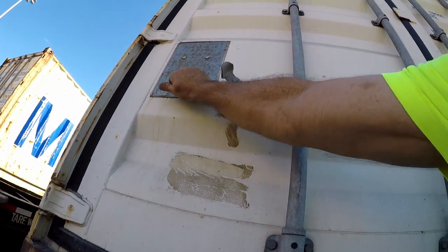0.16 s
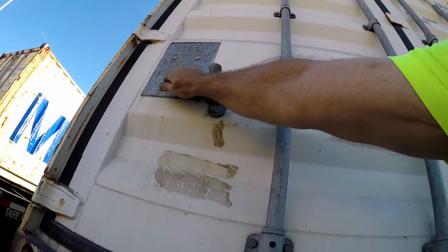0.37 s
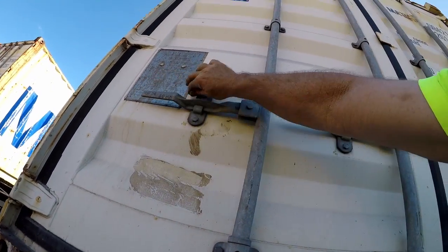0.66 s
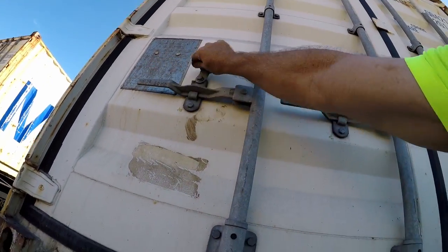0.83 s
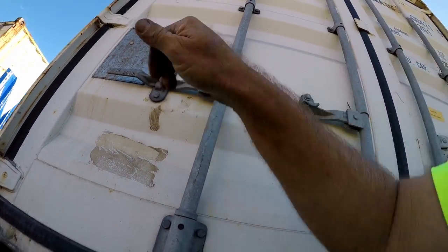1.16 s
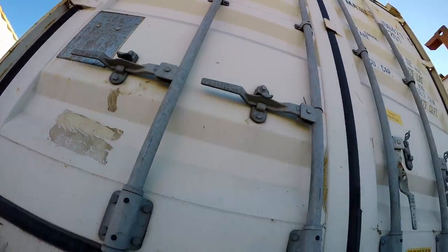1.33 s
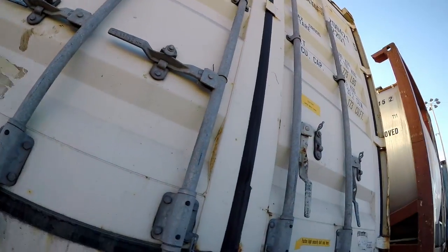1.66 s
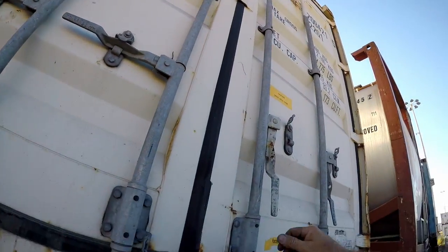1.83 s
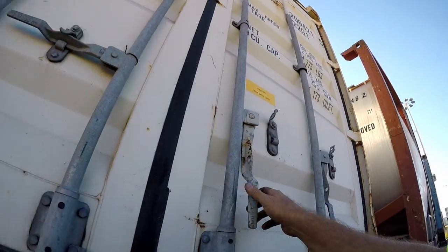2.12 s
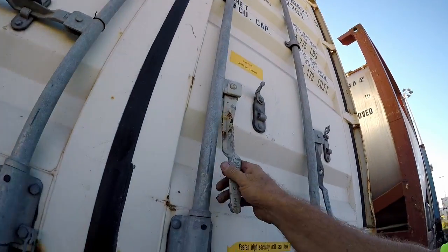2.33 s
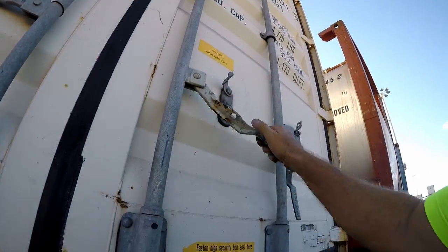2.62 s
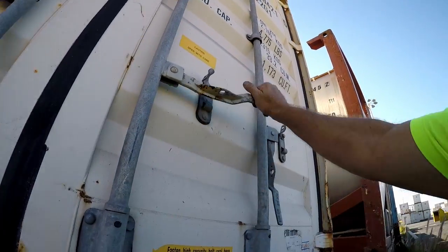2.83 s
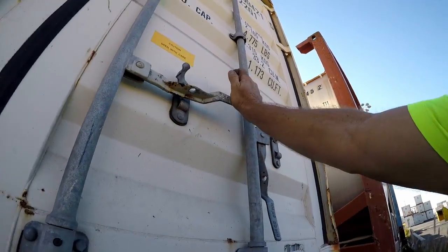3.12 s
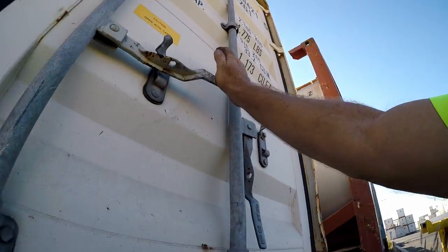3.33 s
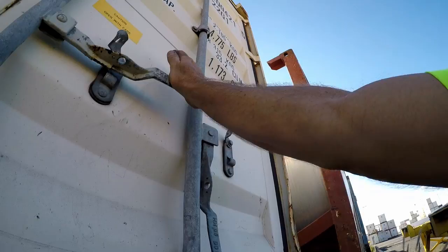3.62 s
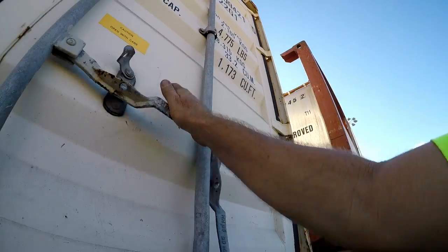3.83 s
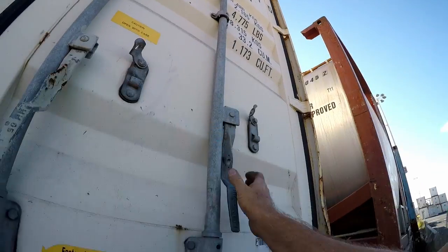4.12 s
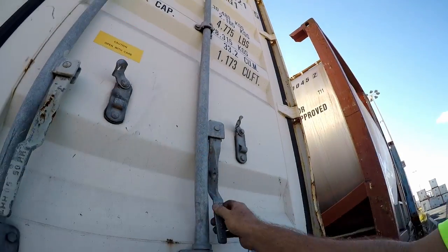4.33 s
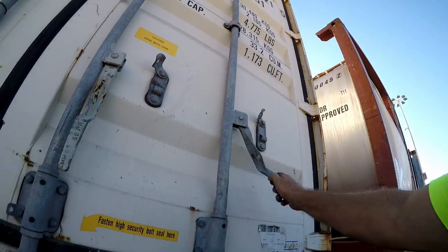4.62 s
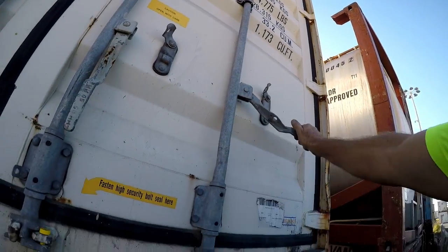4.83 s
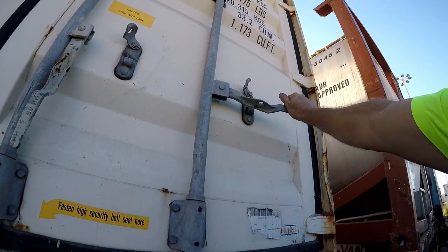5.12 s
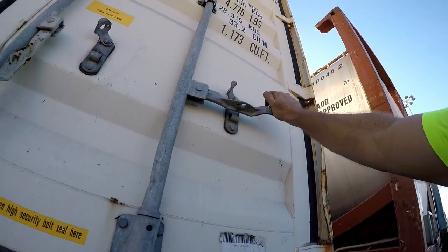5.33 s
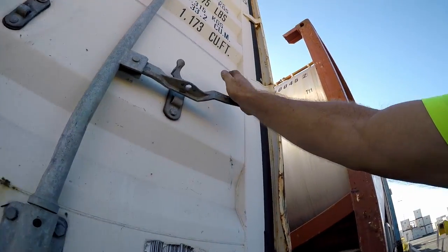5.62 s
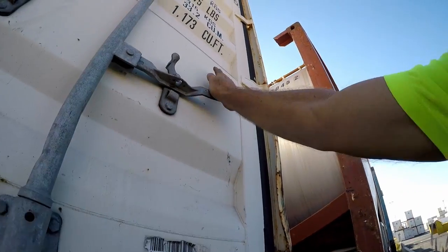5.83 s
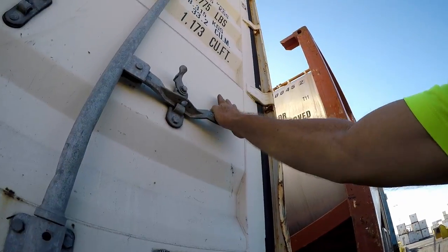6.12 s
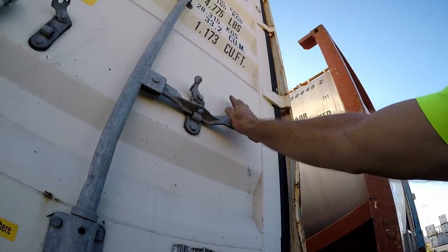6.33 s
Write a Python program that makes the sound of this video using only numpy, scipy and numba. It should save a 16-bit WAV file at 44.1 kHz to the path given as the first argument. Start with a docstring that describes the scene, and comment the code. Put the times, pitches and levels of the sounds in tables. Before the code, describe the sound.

Hand-worked steel handles and locking rods clank against a hollow container door, very close to a body-worn camera. Short bursts of knocks and chinks come with gaps between them, rods scrape softly, a loose handle rings brightly, and the last handle slams home hardest. A deep diesel drone and yard rumble run throughout, ducked by automatic gain after each loud hit.

```python
"""All through, a diesel unit drones over yard rumble (low sine tones, noise), with a faint steady hiss of filtered noise.
From 0.07 s a hand works the steel latch handles of container doors, close to a two-port action camera: knocks in
quick bursts (noise cracks, rattling tails, short pings), panel thumps and chinks (fading tones), rods hissing as
they turn (noise). Near 4 s a loose handle rings; the heaviest blows come from 5.65 to 6.05 s, then a last hiss.
Gain control ducks at each loud blow and recovers slowly."""
import sys
import numpy as np
from scipy import signal
from scipy.fft import rfft, irfft
from scipy.io import wavfile
from scipy.ndimage import uniform_filter1d
from numba import njit

SR = 44100
rng = np.random.default_rng(int(sys.argv[2]) if len(sys.argv) > 2 else 0)


def wav_out(sig):
    """Save sig, one row per channel (or a flat mono array), as 16-bit PCM at SR to the path in sys.argv[1]."""
    wavfile.write(sys.argv[1], SR, np.round(np.clip(np.atleast_2d(sig).T, -1, 1) * 32767).astype(np.int16))


def invert_db(x):
    """Field ratio 10**(x/20) for x, a level in decibels (scalar or array-like)."""
    u = np.asarray(x, float) / 20
    return 10 ** u


N = 284886  # length [samples]

# phase step [radians] that sets the right port's own part of a tone a quarter cycle from the shared part
QUARTER = np.array([[0], [-np.pi / 2]])


def coloured(shape):
    """Two unrelated noises with the given spectrum (frequency [Hz], level [dB]), scaled to rms 1."""
    hz, db = np.transpose(shape)
    f = np.maximum(np.fft.rfftfreq(N, 1 / SR), 1)
    gain = invert_db(np.interp(np.log(f), np.log(hz), db))
    x = irfft(rfft(rng.standard_normal((2, N))) * gain, N)
    return x / x.std()


def noise_band(centre_hz, width_hz):
    """Two unrelated noises kept to one band of pitch, scaled to rms 1."""
    edges = [centre_hz - width_hz / 2, centre_hz + width_hz / 2]
    sos = signal.butter(2, edges, "band", fs=SR, output="sos")
    x = signal.sosfilt(sos, rng.standard_normal((2, N)))
    return x / x.std()


def bands(x, lo_hz, step, count):
    """Split into overlapping bands, step octaves apart, that add up to the whole: (centre Hz, sound)."""
    spec = rfft(x)
    f = np.maximum(np.fft.rfftfreq(N, 1 / SR), 1)
    place = np.clip(np.log2(f / lo_hz) / step, 0, count - 1)
    for k in range(count):
        weight = np.cos(np.pi / 2 * np.clip(place - k, -1, 1)) ** 2
        yield lo_hz * 2 ** (k * step), irfft(spec * weight, N)


def walk(rate):
    """Random levels held 1 / rate s and smoothed twice; spread near 1."""
    k = int(SR / rate)
    held = np.repeat(rng.standard_normal(N // k + 1), k)
    return 0.83 * uniform_filter1d(uniform_filter1d(held, k), k)[:N]


def add(out, s, sound):
    """Mix a sound in at time s."""
    i = int(s * SR)
    out[..., i:i + sound.shape[-1]] += sound[..., :N - i]


def ring(hz, db, t60, rise_s, phase=0):
    """One mode of struck metal: a sine that builds up, then falls 60 dB in t60 seconds."""
    t = np.arange(int(t60 * SR)) / SR
    envelope = invert_db(db - 60 * t / t60) * (1 - np.exp(-t / rise_s))
    return envelope * np.sin(2 * np.pi * hz * t + phase)


# how the background's treble rises and falls: (time [s], level [dB])
TREBLE_LEVELS = [(0, 2), (1.4, 1), (2.2, 1.3), (3.0, 1.1), (3.45, -1.5), (3.9, 1.5), (4.3, 0.5), (4.9, 2.3),
                 (5.6, 3.5), (5.9, -1.5), (6.2, -4), (6.46, 2)]


def treble():
    """Gain of the yard's treble and steady hiss over time."""
    return invert_db(np.interp(np.arange(N) / SR, *np.transpose(TREBLE_LEVELS)))


# colour of the yard noise: (frequency [Hz], relative level [dB per Hz])
YARD_SPECTRUM = [(11, -51.5), (18, -8.5), (49, -2.5), (116, -7.5), (227, -24.5), (276, -32), (569, -37),
                 (795, -32), (1280, -38), (1550, -49.5), (1990, -49), (2560, -55), (4000, -64),
                 (7180, -73.5), (10000, -72), (12200, -80.5), (14000, -114)]


def yard():
    """Distant machines and traffic as noise; octave bands flicker a little on their own."""
    level_db = -12
    swell_db = -1.5 * walk(0.55)  # the rumble comes and goes
    out = np.zeros((2, N))
    for hz, noise in bands(coloured(YARD_SPECTRUM), 30, 1, count=9):
        gain = invert_db(0.65 * walk(14) + swell_db * (60 < hz < 300))
        if hz > 3000:
            gain = gain * treble()
        out += gain * noise
    return invert_db(level_db) * out


def air_hiss():
    """A faint hiss in the yard that never stops: band noise that follows the treble level."""
    return invert_db(-61.5) * treble() * noise_band(centre_hz=6660, width_hz=1900)


# level of the diesel's second firing order: (time [s], level [dB])
SECOND_ORDER = [(0, -18.5), (.6, -10), (1.5, -17.5), (2.6, -17.5), (3.5, -21), (4.8, -11.5), (5.5, -30.5),
                (6.44, -19.5)]
# fan and gear tones: (frequency [Hz], width [Hz], level [dB])
WHINE_TONES = [(824.5, 16, -41), (1565, 64, -55.5), (1987, 40, -53.5), (2150, 41, -73.5)]


def diesel():
    """Two firing orders and a fainter hum, all wandering in level, and narrow wavering noise tones."""
    firing_hz, firing_db, hum_hz, hum_db = 30.16, -14.5, 50.6, -19.5
    t = np.arange(N) / SR
    firing = 2 * np.pi * np.cumsum(firing_hz * (1 + 0.013 * walk(15))) / SR  # speed wavers slightly
    second_db = np.interp(t, *np.transpose(SECOND_ORDER))
    hum = 2 * np.pi * hum_hz * t
    out = np.zeros((2, N))
    for phase, db in ((firing, firing_db), (2 * firing, second_db), (hum, hum_db)):
        out += np.sqrt(2) * invert_db(db + 4 * walk(3.56)) * np.sin(phase + QUARTER)
    for hz, width_hz, db in WHINE_TONES:
        out += invert_db(db + 4 * walk(5)) * noise_band(hz, width_hz)
    return out


# rods turning in their guides: (start time [s], length [s], hiss level [dB])
ROD_STROKES = [(0.102, 0.23, -62), (0.85, .5, -68), (2.3, 0.69, -59.5), (3.697, 0.55, -54.5),
               (5.329, 0.43, -60.5), (5.958, 0.094, -56.5), (6.389, .2, -46)]


def rod_strokes():
    """Grainy hiss of steel sliding on steel, each stroke rising, holding and falling."""
    rise_s = 0.051
    t = np.arange(N) / SR
    push = np.zeros(N)
    for s, long_s, db in ROD_STROKES:
        to_edge = np.minimum(t - s, s + long_s - t)
        push += invert_db(db) * np.clip(to_edge / rise_s, 0, 1)
    grain = invert_db(2 * walk(80))
    return noise_band(centre_hz=8300, width_hz=3800) * push * grain


# blows heavy enough to move the panels:
# (time [s], level [dB], place across the door [0-1], hardness as a tilt [dB per octave])
PANEL_BLOWS = [(.069, -10.5, 0.42, 2.5), (0.525, -27, 0.51, 2.5), (0.799, -25, 0.53, -0.5),
               (2.626, -14, .28, -3), (3.345, -5.5, 0.11, -2), (4.087, -1.5, 0.21, -7.5),
               (5.654, -1, .48, -6), (5.688, 3, 0.4, -13), (6.01, 1, .3, -0.5)]
# low modes of the door panels: (frequency [Hz], level [dB], decay t60 [s])
PANEL_MODES = [(106.7, 6, 0.42), (133.23, -2, 0.89), (163.4, 6, 0.28), (216.4, -1.5, 0.52),
               (257.2, -2, 0.36), (261, -2, 0.15), (420, -18.5, 0.23), (550, -26.5, 0.15), (770, -6, 0.085),
               (929, -17, 0.37), (1090, -11.5, 0.21)]


def panel_thumps():
    """Heavy blows set the panels' low modes going; the place hit decides which ones move."""
    out = np.zeros((2, N))
    for s, db, place, tilt_db in PANEL_BLOWS:
        for k, (hz, mode_db, t60) in enumerate(PANEL_MODES):
            # a blow near a node line barely moves that mode
            reach = np.cos(np.pi * (k + 1) * place)
            level_db = db + mode_db + tilt_db * np.log2(hz / 130)
            add(out, s, reach * ring(hz, level_db, t60, 0.0055, QUARTER))
    return out


# a loose handle struck as it swings: (time [s], level [dB], time it rings freely [s])
HANDLE_SWINGS = [(3.974, -49, .06), (4.079, -19.5, .115), (4.098, -28, .07)]
# handle modes before brightening and stretching: (frequency [Hz], level [dB], base decay t60 [s])
HANDLE_MODES = [(4420, -27, 0.25), (4565, -22, 0.2), (4829, -17, 0.4), (5179, -14, 0.31), (5340, -18, 0.35),
                (5760, -16, 1), (6196, -24, 0.16), (6815, 3, 0.2), (6971, -2, 0.08), (7730, -18, 1.2),
                (7870, -8, 1.6), (8037, -24, 1), (8156, -9, 0.36), (8398, -10, 0.27), (8522, -17, 0.4),
                (8969, -19, 0.33), (9049, -15, 0.45), (9211, -14, 1.3), (9448, -30, 0.5), (9889, -16, 0.2),
                (10180, -14, 0.22), (10500, -19, 0.19), (10970, -30, 0.08), (11440, -35, 0.4),
                (11890, -29, 0.18), (12110, -36, 0.32), (12540, -22, 0.095), (13090, -37, 0.13),
                (13500, -28, 0.09), (13820, -31, 0.2)]


def handle_rings():
    """A swinging handle rings in many high modes until it comes to rest against the door."""
    out = np.zeros((2, N))
    for s, db, free_s in HANDLE_SWINGS:
        for hz, mode_db, t60 in HANDLE_MODES:
            level_db = db + mode_db + 7.2 * np.log2(hz / 7000)
            phase = rng.uniform(0, 2 * np.pi, (2, 1))
            mode = ring(hz, level_db, min(2.5 * t60, 1.3), 0.00072, phase)
            # the door then damps the modes with the shortest base decay most
            rested_s = np.maximum(np.arange(mode.shape[1]) / SR - free_s, 0)
            add(out, s, mode * invert_db(-105 / min(t60, .7) * rested_s))
    return out


# keeper plates and pins chink: (time [s], level [dB], pitch that the spot of contact favours [Hz],
# how freely it rings [times the mode's decay], wear [0-1])
CHINK_HITS = [(0.069, -23, 560, 2.4, 0.97), (0.077, -29, 1020, 1, 1), (.141, -48, 6650, 2.3, 0.7),
              (.153, -41, 7450, 0.93, 0.5), (.725, -46, 3545, 0.44, 0.5), (0.798, -16.5, 513, 0.64, 1),
              (.865, -49, 7900, 1, 0.4), (.89, -49, 7900, 0.45, .3), (0.982, -28.5, 4160, 0.7, 0.97),
              (1.025, -40, 4700, 0.8, .3), (1.045, -50, 7900, 0.53, .3), (1.088, -46, 4200, 0.29, 1),
              (1.215, -41, 3070, 0.41, 0.7), (1.319, -49, 4380, 0.29, 0.6), (2.359, -30, 1280, 1.2, 0.95),
              (2.397, -38, 3900, .6, 0.4), (2.41, -22.5, 1250, 0.67, 0.8), (2.44, -43, 3530, 0.77, 0.4),
              (2.541, -26.5, 3430, 0.27, 1), (2.551, -23, 815, 0.78, 1), (2.621, -33, 4450, 0.43, 0.5),
              (2.63, -27, 1900, .6, 0.86), (2.628, -44, 6000, .9, 0.2), (2.643, -42, 3900, 0.46, 0.3),
              (2.683, -37, 1910, .6, 0.97), (2.693, -25, 1020, 1.3, 1), (2.802, -56, 8500, .9, 0.3),
              (3.354, -25.5, 505, 1.3, 0.83), (3.533, -45, 3084, 0.56, .1), (3.701, -46, 5600, 0.49, .5),
              (3.894, -41, 8670, .3, 0.9), (3.902, -30, 3070, 1, 0.34), (3.976, -28.5, 2185, 0.62, 0.06),
              (3.977, -45, 5600, .5, 0.7), (4.081, -4.5, 1846, 1.2, 0.89), (4.088, -9.5, 2185, .5, 0.3),
              (4.446, -43.5, 3070, 0.51, 0.1), (4.64, -37, 2390, 1.8, 0.5), (4.642, -39, 3545, 0.55, 0.6),
              (5.551, -15.5, 915, 0.25, 0.9), (5.654, -20, 6650, 0.71, 0.6), (5.687, -18, 6420, 0.34, 0.95),
              (5.655, -8, 640, 1.6, 1), (5.701, -24, 802, 1.3, 1), (5.669, -29, 6500, 0.77, 0.4),
              (5.7, -13.5, 2300, 0.82, 0.3), (5.713, -20, 2200, 1.35, 1), (5.714, -23, 4380, 1.1, 0.6),
              (5.725, -22.5, 480, 1.3, 1), (5.748, -23, 1250, 1.3, 0.6), (5.8, -35, 710, 1, 1),
              (5.72, -28, 1020, 1.2, 0.3), (5.746, -28.5, 4380, 0.46, 0.1), (5.747, -30, 9100, 0.77, 0.6),
              (5.775, -27.5, 2185, 1.4, 0.5), (5.784, -49.5, 9100, 1.3, 0.94), (6.012, -18, 800, 0.53, 1),
              (6.02, -51, 9140, .6, .7), (6.028, -16, 1250, 1.2, 0.9), (6.045, -20.5, 915, 1.8, 1),
              (6.049, -25.5, 598, 1.2, 1)]
# modes of a keeper plate: (frequency [Hz], level [dB], base decay t60 [s])
KEEPER_MODES = [(474, 3.5, 0.18), (649, -4.5, 0.17), (915, 3, 0.082), (1020, 3, 0.089), (1250, -1, 0.078),
                (1506, 1.5, 0.24), (2185, 2.5, 0.16), (2390, 5, 0.046), (3070, 6, 0.13), (3545, -3.5, 0.22),
                (3900, -4, 0.22), (4380, 6, 0.11), (4700, -4.5, 0.2), (5600, -1.5, .1), (6050, -6, 0.18),
                (6650, -0.5, 0.064), (7450, -2, 0.074), (7900, -3, 0.14), (8900, 2, 0.21), (9300, 1, .15)]


def chinks():
    """Small plates and pins ring in modes near the favoured pitch; wear splits each into a beating cluster."""
    favour_db_per_octave = 47  # fall away from the favoured pitch in worn parts, twice so in unworn ones
    out = np.zeros((2, N))
    for s, db, favoured_hz, free, wear in CHINK_HITS:
        for hz, mode_db, t60 in KEEPER_MODES:
            octaves_away = abs(np.log2(hz / favoured_hz))
            level_db = db + mode_db - favour_db_per_octave * (2 - wear) * octaves_away
            if level_db < -85:  # too faint to matter
                continue
            for k, (split, phase) in enumerate(rng.uniform(-1.1, 1, (5, 2))):
                share = np.clip(wear, 0, 1) if k else 1
                split_hz = hz * (1 + 0.008 / t60 * split * wear)  # wider the more it is damped
                start = np.pi * phase + QUARTER * np.sign(split)
                add(out, s, share * ring(split_hz, level_db, t60 * free, 0.0018, start))
    return out


# metal on metal: (time [s], relative level [dB], body near 950 Hz and below [dB],
# edge near 7600 Hz and above [dB], decay t60 at 2700 Hz [s])
KNOCK_HITS = [(0.0695, -15, 1.5, -1, 0.17), (0.524, -31.5, 4, -11, 0.12), (0.7157, -22.5, -0.5, -12, 0.085),
              (0.757, -25.5, 1.5, -11, 0.2), (0.7938, -17, 0.5, -4.5, 0.088), (0.803, -27.5, 9, -8, 0.12),
              (0.863, -31, -5, -9, 0.18), (0.893, -31, 5, -1, 0.27), (0.925, -33, 7, -3, 0.22),
              (0.9449, -19.5, -1, 7.5, 0.24), (0.96, -26, 2, 3, 0.14), (0.9787, -17.5, -2.5, 9, 0.096),
              (1.044, -28.5, 6, -10, 0.11), (1.096, -37.5, 0, -11, 0.086), (1.1862, -32.5, 9.5, 3.5, 0.065),
              (1.2017, -36.5, -7, 1, 0.25), (1.215, -38, -5, 4, 0.13), (1.276, -44, -2.5, 4, .06),
              (1.312, -24, -14, -5.5, 0.13), (1.3275, -32, -12, -4, 0.1), (2.3599, -31.5, 8.5, -12, 0.19),
              (2.398, -30.5, 5, -4.5, 0.21), (2.5158, -25.5, 4, -5, 0.033), (2.54, -23, -4, -5, 0.1),
              (2.547, -25.5, 5.5, -15, 0.25), (2.6228, -24, -2.5, -12, 0.16), (2.643, -36, 2.5, -14, 0.14),
              (2.678, -30.5, 3.5, -22, 0.071), (2.699, -34.5, 7.5, -15, 0.14), (2.73, -43, 7, -10, 0.11),
              (2.798, -46, -9, 13, .06), (3.0538, -45.5, 12.5, 7.5, 0.43), (3.261, -32, 6, -14, 0.098),
              (3.338, -45.5, 5, 12, 0.35), (3.349, -42, 19.5, -17, 0.13), (3.395, -45.5, -11, 11, 0.21),
              (3.487, -32.5, -4.5, -20, 0.098), (3.699, -52, -13.5, 18, 0.07), (3.894, -30, 4, 0.5, 0.2),
              (3.925, -40.5, -2, 5, 0.26), (3.972, -31.5, 4, -14, 0.25), (4.0788, -10.5, -4, 8.5, 0.37),
              (4.098, -18, -3.5, 12.5, 0.086), (4.296, -50, -6.5, 11, .1), (4.323, -49.5, -7.5, 15, .1),
              (4.355, -54, -9.5, 11, .1), (4.637, -34, -6.5, -6, 0.097), (5.552, -25.5, -1.5, -19, 0.072),
              (5.6529, -18.5, 9.5, 4, 0.16), (5.6682, -16.5, -16.5, 8.5, 0.25), (5.685, -15, 1.5, 11, 0.29),
              (5.711, -20.5, 3.5, -2, 0.14), (5.734, -18, -2.5, 10.5, 0.093), (5.7558, -22, 5, -26, 0.14),
              (5.778, -37, 11.5, -5, 0.22), (5.805, -36.5, 9, -10, 0.17), (5.85, -38, 9, -2.5, 0.08),
              (6.01, -14.5, 4, 5.5, 0.21), (6.035, -35, 11.5, -7, 0.23)]
# colour of the shaken door sheet: (frequency [Hz], relative level [dB per Hz])
SHEET_SPECTRUM = [(180, -0.5), (300, -8), (370, -12), (709, -5.5), (1170, -6), (1620, -15), (2240, -14.5),
                  (3710, -26), (4220, -27), (6600, -27), (8200, -32.5), (10500, -28.5), (14500, -63)]


def sheet_knocks():
    """The sheet's dense modes act as noise: a crack, a rattling tail longest in the bass, a hollow boom."""
    out, t = np.zeros((2, N)), np.arange(SR // 2) / SR
    chatter = invert_db(3 * walk(180))  # loose parts bounce on after each knock
    for hz, noise in bands(coloured(SHEET_SPECTRUM), 350, .75, count=8):
        shake, snap, octave = np.zeros(N), np.zeros(N), np.log2(hz / 2700)
        shorten = 2 ** (-.3 * octave - .35 * max(octave - 1, 0))
        # the empty box behind the door answers late and dull
        hollow = invert_db(-23.5 - 6.43 * octave - 60 * t / 0.47)
        # low modes take longer to build up
        build_up = 1 - np.exp(-t / (0.0043 * 2 ** -octave))
        for s, db, body_db, edge_db, t60 in KNOCK_HITS:
            tilt_db = np.interp(octave, [-1.5, 0, 1.5], [body_db, 0, edge_db])
            # lighter knocks lose the air above 10 kHz
            tilt_db += 3.7 * (db + 11.5) * (hz > 10000)
            gain = invert_db(db + tilt_db)
            tail = invert_db(-60 * t / (max(t60, .02) * shorten))
            # harder blows crack more sharply
            crack = 4.15 * invert_db(0.25 * db) * np.exp(-t / 0.002) * (1 - np.exp(-t / 0.00054))
            add(snap, s, gain * crack[:SR // 20])
            add(shake, s, gain * (tail + hollow) * build_up)
        out += (snap + shake * chatter) * noise * invert_db(1.5 * walk(250))
    return invert_db(3) * out


def knock_pings():
    """Rods, cams and brackets: each knock sets off its own 30 short pings of random pitch, size and life."""
    out = np.zeros((2, N))
    for s, db, _, edge_db, t60 in KNOCK_HITS:
        for pitch, size, life, phase in rng.uniform(size=(30, 4)):
            hz = 700 * 12 ** pitch
            ping_db = db - 9 - 12 * size + (edge_db - 6) * pitch
            start = 2 * np.pi * phase + QUARTER * np.sign(phase - .5)
            add(out, s, ring(hz, ping_db, t60 * (0.15 + 0.27 * life), 0.0033, start))
    return invert_db(3) * out


def scene():
    """Row 0 reaches both ports; row 1 is what only the right port hears."""
    background = yard() + air_hiss() + diesel()
    struck = panel_thumps() + handle_rings() + chinks()
    return background + rod_strokes() + struck + sheet_knocks() + knock_pings()


# the two ports: (frequency [Hz], likeness [0-1], left minus right [dB], left leads by [radians])
PORT_RESPONSE = [(20, .95, 0, 0), (130, .95, .3, .15), (260, .93, -1, .5), (350, .3, 2, -.5),
                 (480, .85, 9, -2.1), (900, .96, 1, -2.2), (1900, .75, 0, -1.3), (3000, .8, -1, -1.1),
                 (4000, .6, 2, -.3), (5200, .3, 7, .2), (7000, .25, 11, 1.), (9500, .25, -1, 1.5),
                 (15000, .25, -6, 1.5)]


def two_ports(dry):
    """The ports differ in level and phase, and hear less alike where the likeness is low."""
    hz, *columns = np.transpose(PORT_RESPONSE)
    f = np.fft.rfftfreq(N, 1 / SR)
    like, left_db, lead = (np.interp(f, hz, c) for c in columns)
    like = np.clip(like, 0, 1)
    common, own = rfft(dry)
    right = (like * common + np.sqrt(1 - like ** 2) * own) * np.exp(-1j * lead)
    return irfft(np.array([common * invert_db(left_db / 2), right * invert_db(-left_db / 2)]), N)


@njit
def follow(x, attack, release):
    """Peak follower: quick up, slow down, starting at the peak of the first 2800 samples."""
    y, e = np.empty(len(x)), x[:2800].max()
    for i in range(len(x)):
        e += (x[i] - e) * (attack if x[i] > e else release)
        y[i] = e
    return y


def gain_control(x):
    """The camera turns both ports down within milliseconds of a loud blow and back up over about a second."""
    attack_s, release_s = 0.0027, 1.1
    peak = follow(np.abs(x).max(axis=0), 1 / (attack_s * SR), 1 / (release_s * SR))
    return x * np.minimum(.5 / peak, 1.3) ** 1.129


def band_limit(x):
    """A steep low-pass at the top of the band."""
    return signal.sosfilt(signal.butter(12, 14830, fs=SR, output="sos"), x)


def record(dry):
    """Two ports of unlike colour and phase, slow-release gain control, soft ceiling, steep treble cut."""
    x = gain_control(two_ports(dry))
    x = np.tanh(1.061 * x) / 0.73  # soft ceiling
    low_pass = signal.ellip(8, .2, 60, 14800, fs=SR, output="sos")
    mix = signal.sosfilt(low_pass, x)
    return band_limit(mix)


dry = scene()
out = record(dry)
wav_out(out)
```